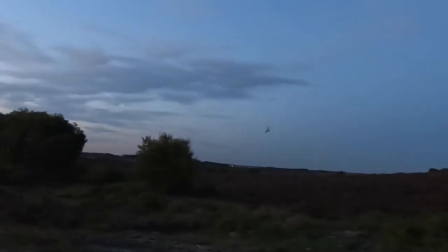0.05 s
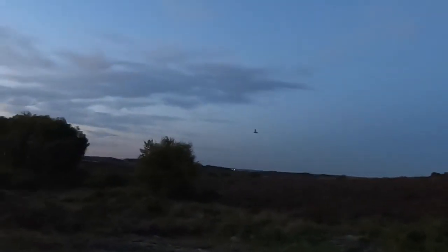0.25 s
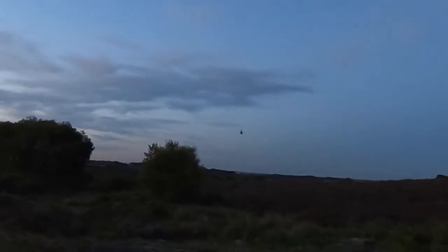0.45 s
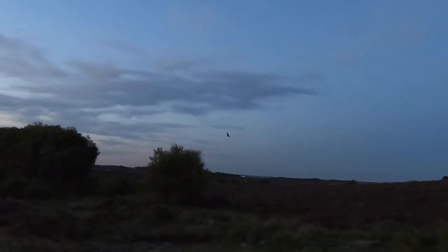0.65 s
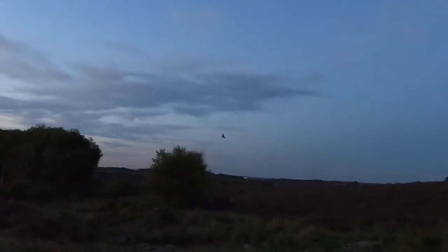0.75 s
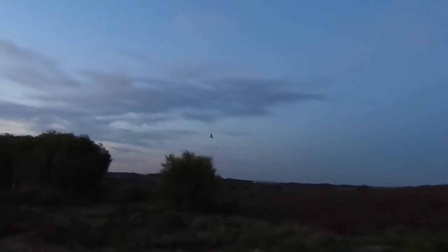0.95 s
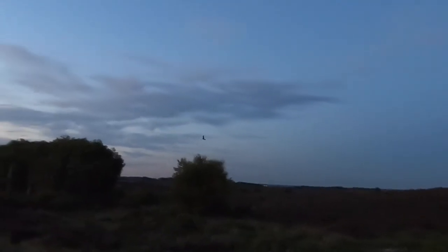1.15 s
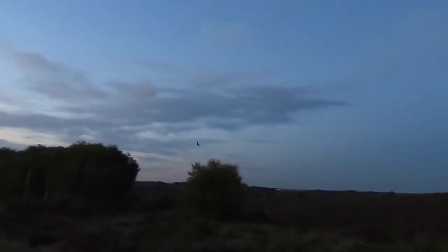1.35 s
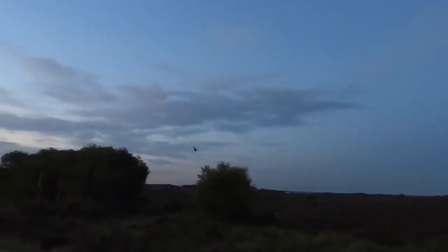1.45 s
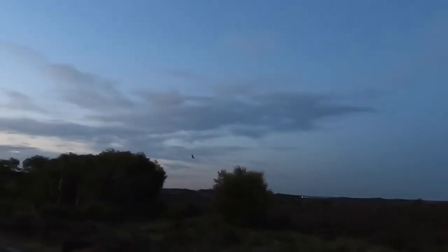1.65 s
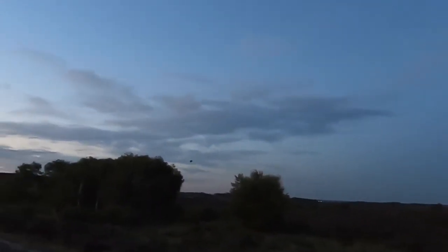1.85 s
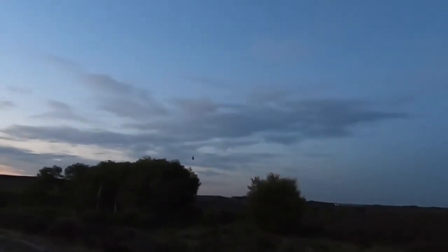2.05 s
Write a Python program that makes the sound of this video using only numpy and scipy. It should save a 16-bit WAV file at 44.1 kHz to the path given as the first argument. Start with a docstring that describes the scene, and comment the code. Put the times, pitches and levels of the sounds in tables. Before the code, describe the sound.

A bird claps its wings in a quick run of dry snaps over soft wind.

```python
"""A low wind blows over open heath at dusk, and small dry ticks begin. From 0.2 s a nightjar in flight
claps its wings about six times a second: each clap is one to four impacts that ring briefly and scatter
off the vegetation. A faint rustle swells; three claps leave a thin metallic ring, and near each of these
the wind bumps the microphone. Dull scuffs fall between the later claps. After the last clap, at 1.8 s,
the rustle fades and the wind remains."""
import sys
import numpy as np
from scipy import signal
from scipy.fft import rfft, irfft
from scipy.io import wavfile

SR = 44100
rng = np.random.default_rng(int(sys.argv[2]) if len(sys.argv) > 2 else 0)


def materialize(psi):
    """Save the field psi as 16-bit PCM at rate SR to the path in sys.argv[1].

    A 1-D psi becomes a single channel; in a 2-D psi each row is a channel.
    """
    bounded = np.clip(np.atleast_2d(psi).T, -1, 1)
    quanta = np.round(bounded * 32767).astype(np.int16)
    wavfile.write(sys.argv[1], SR, quanta)


N = 92610
BURST_SAMPLES = 2048


def undb(db):
    """Amplitude grows tenfold for every 20 dB."""
    return 10 ** (np.asarray(db) / 20)

def unit(x):
    """Normalisation to an rms of 1."""
    return x / np.sqrt(np.mean(x ** 2))

def colour(points, size):
    """Spectral envelope: gains interpolated over log frequency from (Hz, dB) points."""
    hz, db = np.array(points, float).T
    return undb(np.interp(np.log(np.fft.rfftfreq(size, 1 / SR) + 1e-3), np.log(hz), db))

def wander(rate_hz):
    """Random modulation: interpolated noise with an rms of 1."""
    return unit(np.interp(np.arange(N) / SR * rate_hz, np.arange(4096), rng.standard_normal(4096)))

def resonance(hz, centre_hz, half_width_hz):
    """A resonance peak of Lorentzian shape."""
    return unit(1 / (1 + ((hz - centre_hz) / half_width_hz) ** 2))

def minimum_phase(gain):
    """Causality: the response with these gains that starts at once and then dies away."""
    cepstrum = irfft(np.log(gain + 1e-9))
    half = len(cepstrum) // 2
    return np.exp(rfft(np.r_[cepstrum[0], 2 * cepstrum[1:half], np.zeros(half)]))

def add(out, start_s, sound, pan_db=0):
    """Superposition: a sound joins the mix, placed by its level difference, left minus right."""
    start = max(int(start_s * SR), 0)
    part = sound[:max(N - start, 0)]
    out[:, start:start + len(part)] += undb([[pan_db / 2], [-pan_db / 2]]) * part


# Wind spectrum. Each row: frequency in Hz, relative density in dB.
WIND_SPECTRUM = [(35, -8), (60, -8), (95, -14.5), (155, 0), (250, -2), (400, 0), (650, -5.5), (850, 1.5),
                 (1030, 2.5), (1300, -5), (1800, -15), (2500, -38.5), (5000, -30), (15000, -44)]
# Wind width. Each row: frequency in Hz, side minus mid in dB.
WIND_WIDTH = [(30, -6), (130, -6.5), (300, -10.5), (700, -3.5), (1300, -3)]

def wind(level_db=-62):
    """Stationary noise: a steady rush, wide because the channels are only partly correlated."""
    mid, side = rfft(rng.standard_normal((2, N))) * colour(WIND_SPECTRUM, N)
    side = side * colour(WIND_WIDTH, N)
    stereo = irfft(np.array([mid + side, mid - side]), N)
    return stereo / np.std(irfft(mid, N)) * undb(level_db)


# Wind bumps. Each row: centre in seconds, frequency in Hz, envelope peak in dB,
# half length in seconds, left minus right in dB.
WIND_BUMPS = [(.449, 162.4, -52, 0.0071, 1.5), (1.311, 141, -57.5, 0.0079, -3),
              (1.66, 30, -54.5, 0.023, 10)]

def bumps():
    """Wind pressure on the microphone: a few low cycles under a Gaussian envelope."""
    out = np.zeros((2, N))
    for centre_s, hz, db, half_s, pan_db in WIND_BUMPS:
        t = np.arange(N) / SR - centre_s
        envelope = undb(db) * np.exp(-(t / half_s) ** 2)
        add(out, 0, envelope * np.sin(2 * np.pi * (hz * t + rng.random())), pan_db)
    return out


# Rustle spectrum. Each row: frequency in Hz, relative density in dB.
RUSTLE_SPECTRUM = [(800, -9.5), (1600, 8.5), (2600, 2.5), (4100, 5), (5500, 0.5), (8800, -9.5),
                   (10200, -10), (12500, -29.5), (15000, -42)]
# Rustle swell. Each row: time in seconds, mid level between lulls in dB.
RUSTLE_SWELL = [(.3, -78.5), (.9, -68.5), (1.7, -67), (1.95, -80.5)]

def rustle(grain_db=4.4, side_db=-5.5, lull_db=-5.5, lull_lead_s=0.045, lull_width_s=0.011):
    """Amplitude modulation breaks noise into a fine crackle; its level dips just before each snap."""
    t = np.arange(N) / SR
    grains = undb(grain_db * wander(600))
    spectra = rfft(rng.standard_normal((2, N)) * grains) * colour(RUSTLE_SPECTRUM, N)
    mid, side = map(unit, irfft(spectra, N))
    side = side * undb(side_db)
    swell_db = np.interp(t, *np.transpose(RUSTLE_SWELL))
    lulls = [np.exp(-((t + lull_lead_s - start) / lull_width_s) ** 2) for start, *_ in WING_SNAPS]
    return np.array([mid + side, mid - side]) * undb(swell_db + lull_db * np.max(lulls, axis=0))


# Echo width. Each row: frequency in Hz, side minus mid in dB.
SCATTER_WIDTH = [(3500, -11), (8000, 6.5)]

def scatter(dry, db, t60_s, grain_db=5, rise_s=0.0026):
    """Scattering by vegetation: many small echoes form a grainy tail, wider in the treble."""
    size = SR // 2
    t = np.arange(size) / SR
    mid, side = rng.standard_normal((2, size)) * undb(grain_db * wander(500)[:size])
    side = irfft(rfft(side) * colour(SCATTER_WIDTH, size), size)
    tail = np.array([mid + side, mid - side]) * undb(-60 * t / t60_s) * np.minimum(t / rise_s, 1)
    tail /= np.sqrt(np.sum(tail ** 2, axis=1, keepdims=True))
    return undb(db) * signal.fftconvolve(dry, tail, axes=1)[:, :N]


# Lingering rings. Each row: start in seconds, level in dB.
METALLIC_RINGS = [(.45, -64.5), (1.342, -54), (1.662, -58.5)]
# Mode clusters. Each row: centre in Hz, relative level in dB, time to fall 60 dB in seconds.
MODE_CLUSTERS = [(3671, -2, .16), (9550, 0, .07), (11750, -4, .11), (12400, -7, .12), (13660, 0, .18)]

def metallic_rings(width_hz=120, flutter_db=3, flutter_hz=90, faint_db=-42.5):
    """Close modes beat as they decay: clearly after three claps, faintly after every snap."""
    out, t = np.zeros((2, N)), np.arange(SR // 2) / SR
    hz = np.fft.rfftfreq(len(t), 1 / SR)
    faint_rings = [(start, db + faint_db) for start, db, *_ in WING_SNAPS]
    for start, level_db in METALLIC_RINGS + faint_rings:
        for centre_hz, db, t60_s in MODE_CLUSTERS:
            band = np.exp(-((hz - centre_hz) / width_hz) ** 2)
            cluster = irfft(rfft(rng.standard_normal(len(t))) * band)
            flutter = undb(flutter_db * wander(flutter_hz)[:len(t)])
            add(out, start, unit(cluster * flutter) * undb(level_db + db - 60 * t / t60_s))
    return out


# Scuffs. Each row: start in seconds, centre in Hz, rms level before the envelope in dB.
DULL_SCUFFS = [(1.127, 1560, -53.5), (1.2922, 870, -44.5), (1.459, 1000, -54.5), (1.6165, 1130, -42)]

def scuffs(decay_s=0.0019, width_octaves=0.96):
    """Heavy damping: noise in one broad, low resonance dies within milliseconds."""
    out, t = np.zeros((2, N)), np.arange(BURST_SAMPLES) / SR
    hz = np.fft.rfftfreq(BURST_SAMPLES, 1 / SR) + 1
    envelope = np.exp(-t / decay_s) * (1 - np.exp(-10 * t / decay_s))
    for start, centre_hz, db in DULL_SCUFFS:
        band = 1 / (1 + (np.log2(hz / centre_hz) / width_octaves) ** 2) ** 2
        noise = unit(irfft(rfft(rng.standard_normal(BURST_SAMPLES)) * band))
        add(out, start, undb(db) * noise * envelope)
    return out


def contact(decay_ms, attack_ms=0.083, crack=0.51):
    """Broadband excitation: an impulse at first contact, then a brief burst of feather noise."""
    ms = np.arange(BURST_SAMPLES) / SR * 1000
    fade = np.exp(-(ms / decay_ms) ** 1.22)  # holds, then stops quickly
    fade *= 1 - np.exp(-(ms + 1000 / SR) / attack_ms)
    push = rng.standard_normal(BURST_SAMPLES) * fade
    push[0] += crack
    for _ in range(2):  # flatten the spectrum while keeping the burst short
        push = irfft(np.exp(1j * np.angle(rfft(push)))) * np.sqrt(fade)
    return push


# The low, middle and high registers of a snap. Each row: frequency in Hz, relative level in dB.
KNOCK_SPECTRUM = [(200, -32), (800, -10.5), (1300, -1.5), (2300, 0), (3100, 1), (4200, -6), (15000, -73)]
BODY_SPECTRUM = [(1500, -28), (3300, -16.5), (4100, 1.5), (4650, -2.5), (5300, -0.5), (6100, -7),
                 (7200, -26), (15000, -69)]
TREBLE_SPECTRUM = [(4000, -56.5), (6200, -3), (7400, 2.5), (9000, -14), (10400, -7), (12000, -24),
                   (13800, -18.5), (15000, -43)]

def snap(db, ring_hz, ring_db, knock_hz, knock_db, treble_db, decay_ms):
    """Source and filter: a contact excites a hollow knock, a ringing body and a bright edge."""
    size, level_span_s = BURST_SAMPLES, 0.0039  # levels are rms over this span
    ripple_db, ripple_hz = 3.2, 330  # no two contacts have the same colour
    hz = np.fft.rfftfreq(size, 1 / SR)
    push = contact(decay_ms)
    ripple = np.interp(hz / ripple_hz, np.arange(size), rng.standard_normal(size))
    knock, body, treble = (unit(colour(points, size))
                           for points in (KNOCK_SPECTRUM, BODY_SPECTRUM, TREBLE_SPECTRUM))
    body = unit(np.hypot(body, undb(ring_db) * resonance(hz, ring_hz, half_width_hz=149)))
    knock = unit(np.hypot(knock, resonance(hz, knock_hz, half_width_hz=410)))
    gain = np.sqrt(body ** 2 + (undb(knock_db) * knock) ** 2 + (undb(treble_db) * treble) ** 2)
    sound = unit(irfft(rfft(push) * minimum_phase(gain * undb(ripple_db * ripple))))
    return sound * undb(db) * np.sqrt(np.mean(gain ** 2) * level_span_s * SR / size)


# Ticks. Each row: start in seconds, body level in dB, ring in Hz,
# dullness in dB (more knock, less treble).
DRY_TICKS = [(0.0696, -67.5, 5200, -13), (0.151, -66.5, 4150, -1), (0.209, -56, 4300, -5),
             (0.2275, -61.5, 5450, 5), (0.348, -68.5, 4160, 0), (0.4204, -53, 5500, -7),
             (0.4307, -54, 5400, -12), (.436, -52.5, 5500, -14), (.644, -55, 3980, -4.5),
             (0.7316, -68.5, 3990, 14.5), (.793, -63, 4220, 0), (0.8166, -51, 4000, 2.5),
             (0.864, -65, 3770, 4), (0.9094, -58, 4060, 9), (.975, -59.5, 4030, 3), (0.999, -53, 4100, -1),
             (1.0684, -60.5, 4140, 1), (1.0865, -72, 3360, 23.5), (1.1504, -58, 4210, -3),
             (1.1715, -55.5, 3950, -7), (1.2351, -52.5, 4200, 1.5), (1.263, -59, 4200, -4),
             (1.2691, -53.5, 4170, 0.5), (1.312, -52, 4000, -0.5), (1.3284, -58, 5740, -15),
             (1.391, -54.5, 5600, -5), (1.4174, -56.5, 4100, 3), (1.4877, -46.5, 3880, -10),
             (1.54, -58, 3740, 3), (1.5555, -61, 4180, -5), (1.5867, -59.5, 4150, 6.5),
             (1.6156, -53, 4150, 5), (1.648, -51.5, 5500, -9), (1.686, -58, 5500, -8),
             (1.695, -56, 3830, 1), (1.719, -51, 5560, -0.5), (1.745, -60, 4600, 4.5),
             (1.834, -51, 5100, -11), (1.841, -54, 5150, -4), (2.0031, -65.5, 3800, -6)]

def ticks(cutoff_hz=8400, pan_spread_db=3):
    """Weak impacts, dull or bright by their spectral tilt, spread about the middle."""
    out = np.zeros((2, N))
    for start, db, ring_hz, dull_db in DRY_TICKS:
        sound = snap(db, ring_hz, ring_db=0, knock_hz=2384, knock_db=dull_db - 7,
                     treble_db=-11 - dull_db / 2, decay_ms=2.1)
        add(out, start, sound, pan_spread_db * rng.standard_normal())
    return signal.sosfilt(signal.butter(2, cutoff_hz, fs=SR, output="sos"), out)


# Wing impacts. Each row: start in seconds, body level in dB, ring in Hz, ring level in dB,
# knock in Hz, knock level in dB, treble level in dB, decay in milliseconds, left minus right in dB.
# Ring, knock and treble levels are relative to the body.
WING_SNAPS = [(0.1993, -42, 5130, 0, 1260, -11, -12.5, 2.14, 3.5),
              (0.445, -50, 4700, 13, 2300, -17, -14, 1.7, 17),
              (0.449, -35.5, 3990, -4, 2480, -14, -9, 4.5, 3),
              (0.468, -45, 4170, -11, 2300, -26, -12, 0.75, 1),
              (0.6326, -34, 4710, -8, 1110, -18, -18.5, 3.7, 2.5),
              (0.8045, -37.5, 4300, 0, 1500, -16, -14.5, 3.9, 3),
              (0.9833, -33, 4210, 11, 1940, -15, -23.5, 2.7, 2),
              (1.1567, -40.5, 4300, 3, 1420, -8, -12, 2.2, 1.5),
              (1.3372, -37, 5910, 12, 2200, -35, -12, 1.6, -3.5),
              (1.3413, -35.5, 5440, -2, 2150, -11.5, -1, 1.93, 2.5),
              (1.3431, -32.5, 5780, -4.5, 2200, -17, -8, 1.094, -1),
              (1.4975, -35, 5220, -1, 1520, -6, -6, 2.6, 0),
              (1.6593, -41.5, 4000, -16, 1200, -33, -10, 3.4, -8),
              (1.6624, -35, 4100, 1, 1500, -21.5, -12, 2, 0.5),
              (1.6651, -39, 5630, -1, 1500, -34, -17, 3.3, -4),
              (1.67, -39, 4020, 11, 1485, -23, -26, 1.7, 1),
              (1.8229, -48, 5100, 4, 1090, -14, -8.5, 4.4, 4.5),
              (1.827, -44, 4750, 2, 2300, -17, -9.5, 1.4, -4)]

def wing_claps():
    """Impact sound: the wings meet in one or several quick snaps."""
    out = np.zeros((2, N))
    for start, *timbre, pan_db in WING_SNAPS:
        add(out, start, snap(*timbre), pan_db)
    return out


def scene():
    """Superposition of direct sounds, their echoes and rings, the rustle and the wind."""
    direct = wing_claps() + ticks() + scuffs()
    short_tail = scatter(direct, db=-5, t60_s=0.047)
    heath_tail = scatter(direct, db=-20.5, t60_s=0.14)
    return direct + short_tail + heath_tail + metallic_rings() + rustle() + wind() + bumps()

def record(dry):
    """Band limiting: a steep low-pass filter cuts the treble above 15.2 kHz."""
    return signal.sosfilt(signal.ellip(8, .2, 70, 15200, fs=SR, output="sos"), dry)


dry = scene()
out = record(dry)
materialize(out)
```